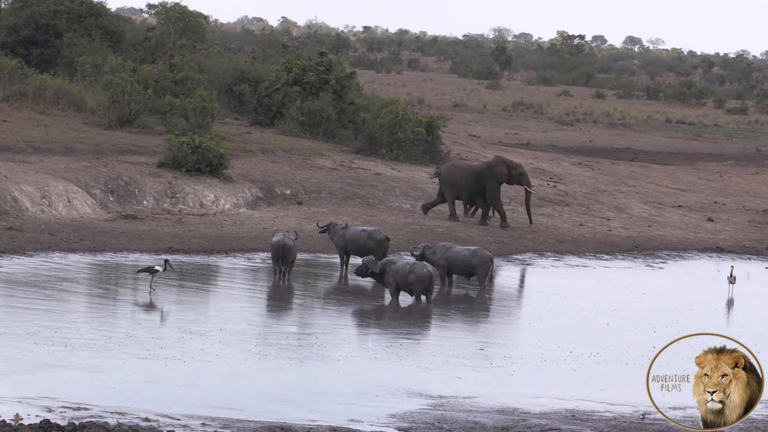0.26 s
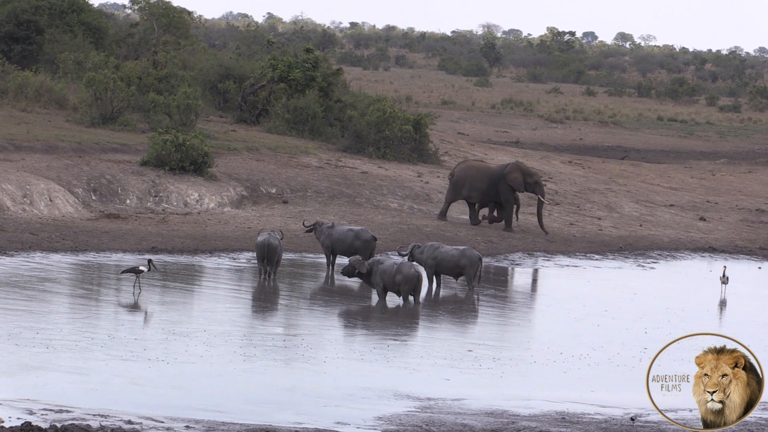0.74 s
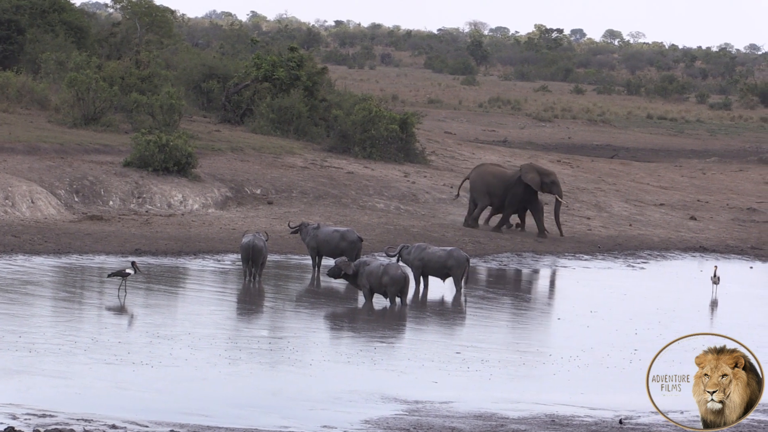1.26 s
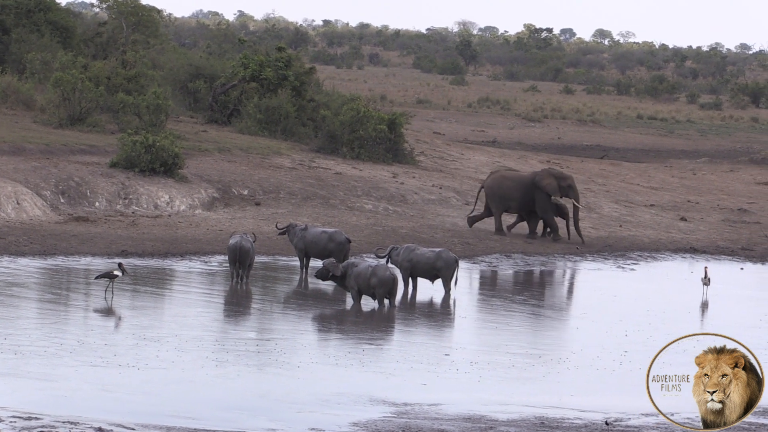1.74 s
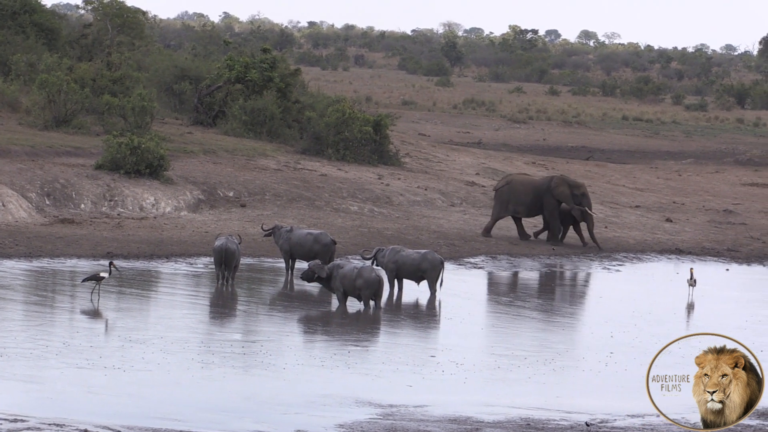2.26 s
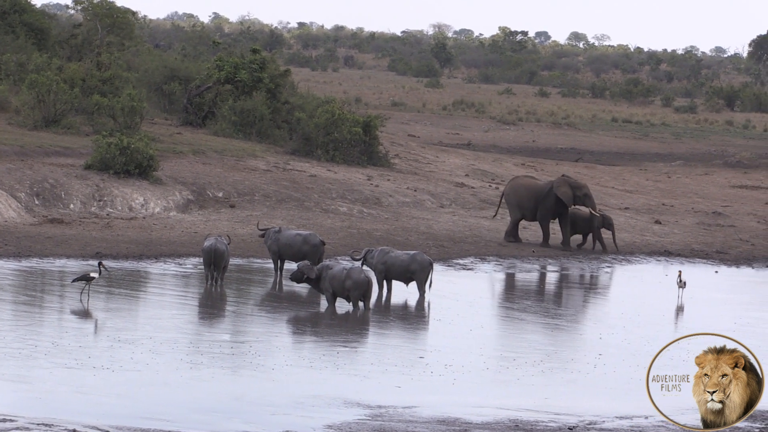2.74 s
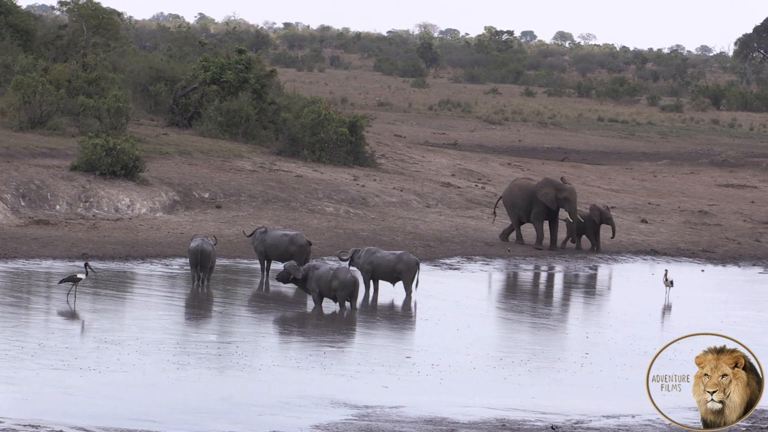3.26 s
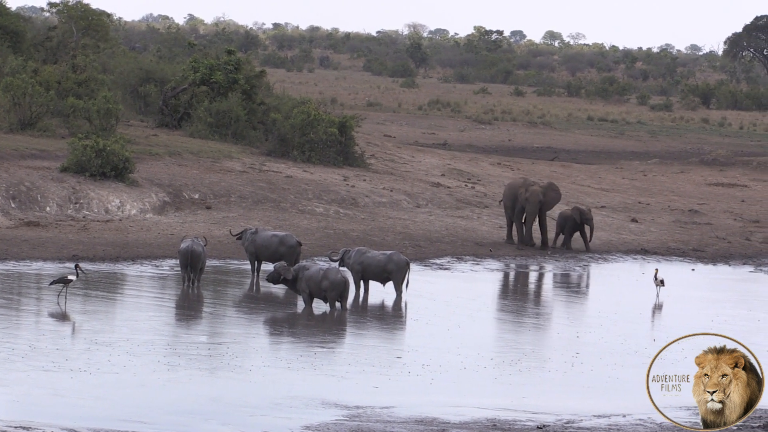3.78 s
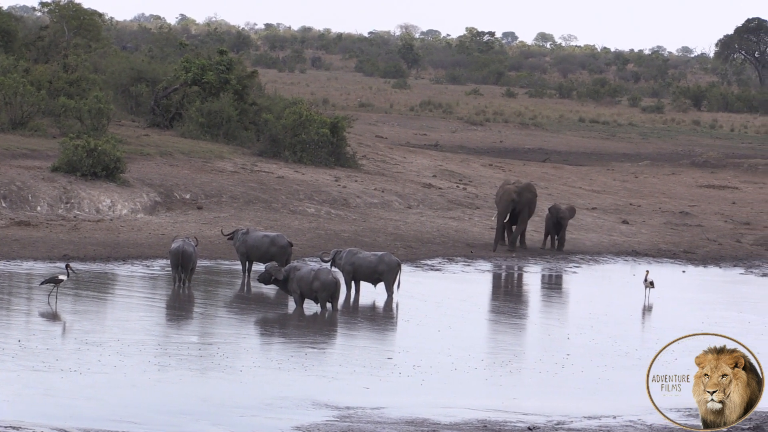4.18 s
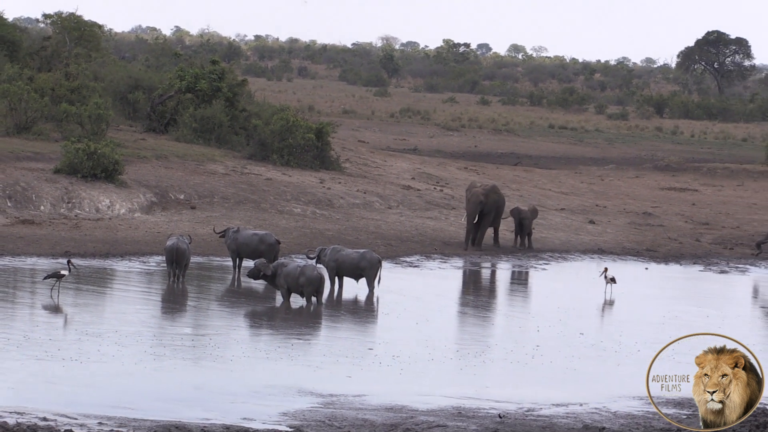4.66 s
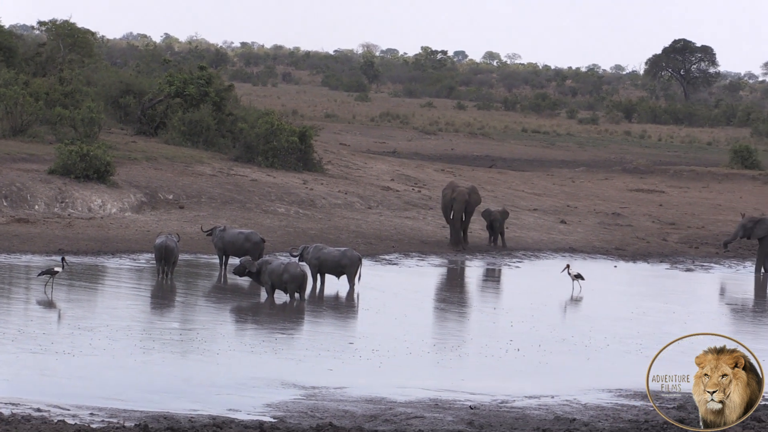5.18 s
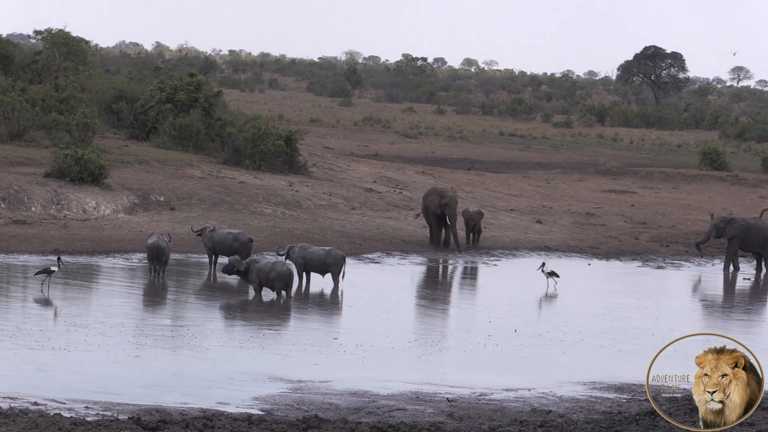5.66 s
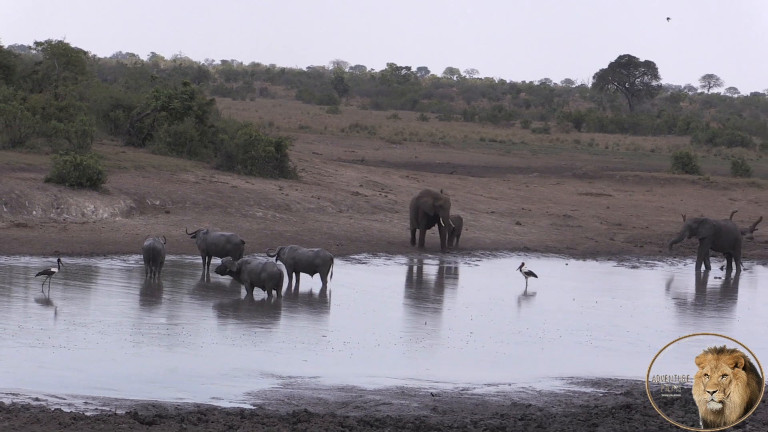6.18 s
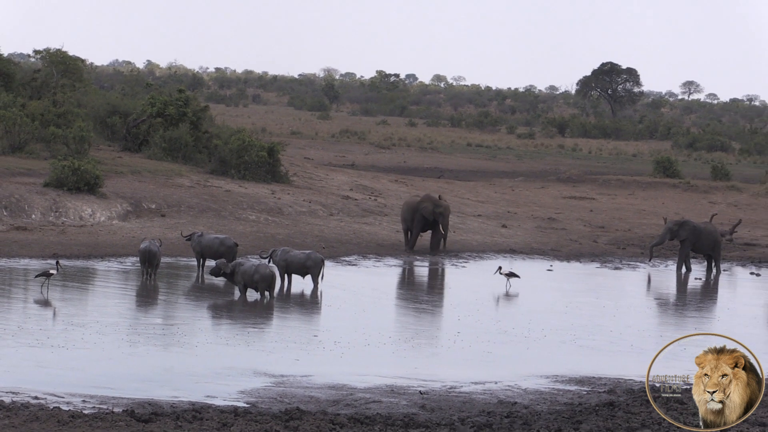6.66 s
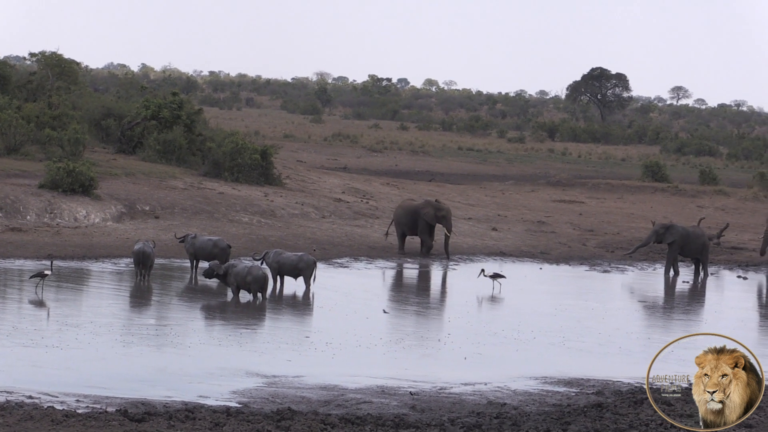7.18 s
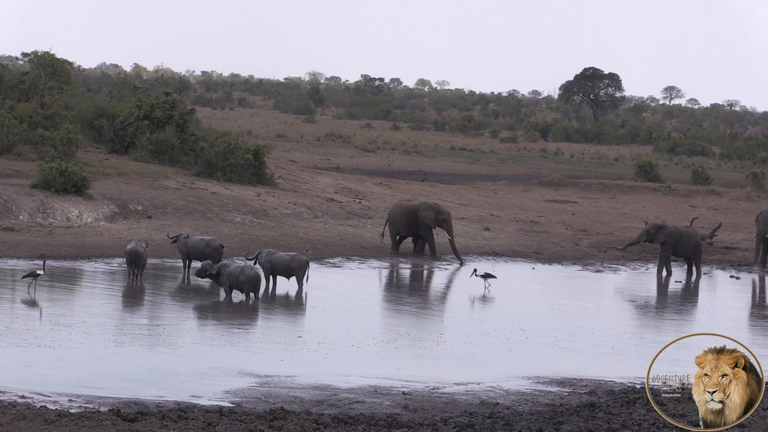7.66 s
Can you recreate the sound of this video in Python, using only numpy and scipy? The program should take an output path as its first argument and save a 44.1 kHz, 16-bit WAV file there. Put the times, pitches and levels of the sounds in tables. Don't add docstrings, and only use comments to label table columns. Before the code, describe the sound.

Whistling waterfowl call almost nonstop at a waterhole, slurring up and flipping higher, over wading splashes, a low engine idle and soft open air.

```python
import sys
import numpy as np
from scipy import signal
from scipy.fft import rfft, irfft
from scipy.io import wavfile
from scipy.ndimage import uniform_filter1d, map_coordinates

SR = 44100
rng = np.random.default_rng(int(sys.argv[2]) if len(sys.argv) > 2 else 0)


def voltage_ratio(decibels):
    exponent = np.asarray(decibels, float) / 20
    return 10 ** exponent


def digitize_waveform(pressure):
    field = np.atleast_2d(pressure).T
    bounded = np.clip(field, -1, 1)
    quanta = np.round(bounded * 32767).astype(np.int16)
    wavfile.write(sys.argv[1], SR, quanta)


N = 349272


def unit(x):
    return x / np.sqrt(np.mean(x ** 2) + 1e-20)


def along(points, hz):
    f, v = np.transpose(points)
    return np.interp(np.log(hz + 1), np.log(f + 1), v)


def curves(rows):
    times, *columns = np.transpose(rows)
    return [np.interp(np.arange(N) / SR, times, column) for column in columns]


def wobble(rate, size=N):
    knots = rng.standard_normal(int(size * rate / SR) + 4)
    return map_coordinates(knots, [np.arange(size) * rate / SR])


def tone(hz):
    return np.sin(2 * np.pi * np.cumsum(hz, axis=-1) / SR)


def add(out, s, sound):
    part = out[..., max(round(s * SR), 0):][..., :sound.shape[-1]]
    part += sound[..., :part.shape[-1]]


def sides(pan_db):
    return voltage_ratio(np.array([pan_db / 2, -pan_db / 2])).reshape(2, -1)


def rush(spectrum, patchy_db):
    # (frequency [Hz], likeness [0-1])
    likeness = [(60, 1), (130, 1), (280, 0.9), (610, 0.92), (1320, 0.67), (2850, 0.21), (6180, 0.066),
                (13400, 0.08)]
    z = signal.stft(rng.standard_normal((2, N)), nperseg=512)[2]
    patches = uniform_filter1d(rng.standard_normal(z.shape[1:]), 6, 0)
    patches = uniform_filter1d(patches, 10, 1)
    noise = signal.istft(z * voltage_ratio(patchy_db * unit(patches)), nperseg=512)[1][:, :N]
    hz = np.fft.rfftfreq(N, 1 / SR)
    turn = np.arccos(np.clip(along(likeness, hz), -1, 1)) / 2
    mid, side = irfft(rfft(noise) * voltage_ratio(along(spectrum, hz)) * [np.cos(turn), np.sin(turn)], N)
    return unit(np.array([mid + side, mid - side]))


def flock():
    # (time [s], gain of the flip tops [dB])
    facing = [
        (0, -1),
        (2, -3.5),
        (4, -2.5),
        (5.5, -1.5),
        (6.8, 2),
        (7.9, 8),
    ]
    # (time of flip [s], slide [s], valley pitch [Hz], level [dB])
    low_pips = [(0.102, 0.067, 1720, -52.5), (0.766, 0.042, 1770, -49.5), (1.84, 0.049, 1774, -46),
                (1.906, 0.043, 1790, -49), (2.468, 0.04, 1790, -45), (2.552, 0.038, 1763, -42.5),
                (3.231, 0.063, 1886, -43), (3.552, 0.047, 1775, -44), (4.014, 0.063, 1705, -46),
                (4.306, 0.039, 1760, -44), (4.915, 0.034, 1750, -49), (4.638, 0.041, 1620, -56),
                (4.89, 0.063, 1800, -45), (.883, 0.04, 1790, -47.5), (4.36, .04, 1740, -47),
                (4.245, .06, 1830, -51), (4.995, 0.048, 1790, -48), (5.074, 0.035, 1836, -43.5),
                (6.954, 0.095, 1682, -49.5), (7.184, 0.022, 1750, -50), (7.571, 0.041, 1640, -51),
                (7.745, 0.045, 1678, -61)]
    high_pips = [(1.305, 0.052, 1962, -46), (1.381, 0.04, 1937, -45), (1.97, 0.071, 1870, -44),
                 (2.351, 0.059, 1930, -46.5), (2.426, 0.038, 1936, -46), (3.139, 0.061, 1860, -44.5),
                 (3.552, 0.05, 1947, -50), (3.919, 0.062, 1935, -48), (5.282, 0.081, 1908, -44),
                 (5.615, 0.085, 1912, -44), (6.01, 0.076, 1860, -44), (6.43, 0.037, 1823, -42),
                 (7.168, .05, 1870, -42), (7.254, 0.04, 1897, -41), (7.902, 0.024, 1915, -50.5),
                 (5.17, 0.047, 1800, -45), (6.85, 0.046, 1780, -45), (6.04, .03, 1800, -48),
                 (6.24, 0.052, 1840, -41), (.796, 0.032, 1760, -48), (.904, .015, 1850, -46),
                 (7.91, .03, 1650, -50)]
    tall_pips = [(.836, .026, 1700, -46), (3.962, .02, 1850, -49), (3.985, .02, 1860, -50),
                 (4.19, .04, 1950, -51), (5.36, 0.055, 1897, -40), (1.882, 0.048, 1950, -44)]
    arches = [(0.18, 0.066, 1740, -46), (0.932, 0.02, 1780, -50.5), (5.62, .015, 1750, -44),
              (4.443, 0.0299, 1760, -47.5), (6.541, 0.057, 1914, -46.5)]
    # (first flip [s], slide [s], valley pitch [Hz], flip spacing [s], level [dB])
    low_flip_arches = [(2.231, 0.048, 1760, 0.021, -45), (3.476, 0.049, 1766, 0.021, -47.5),
                       (3.775, 0.067, 1669, 0.03, -50.5), (5.276, 0.065, 1640, 0.025, -49.5),
                       (6.743, 0.038, 1730, 0.034, -47), (6.873, 0.021, 1800, 0.019, -44.5),
                       (7.269, 0.032, 1704, 0.032, -48.5), (7.497, 0.03, 1885, 0.034, -51),
                       (7.615, 0.05, 1666, 0.03, -48), (7.858, 0.043, 1632, 0.031, -49)]
    high_flip_arches = [(0.092, 0.046, 1974, 0.036, -51.5), (1.616, 0.055, 1890, 0.032, -49),
                        (2.001, 0.038, 1914, 0.033, -49), (2.648, 0.046, 1910, 0.032, -49),
                        (3.999, 0.046, 1940, 0.013, -47), (4.206, 0.074, 1976, 0.04, -49),
                        (4.59, 0.046, 1940, 0.037, -48), (4.961, 0.043, 1890, 0.039, -47),
                        (5.547, 0.03, 1990, 0.021, -46.5), (5.905, 0.052, 1840, 0.021, -48.5),
                        (5.98, 0.056, 2002, 0.028, -50), (6.33, 0.08, 1930, 0.036, -52)]
    short_twos = [(5.65, .02, 1730, .028, -54), (7.024, .042, 1760, .026, -47),
                  (7.087, .03, 1700, .029, -48), (6, .02, 1750, .031, -49),
                  (3.19, .02, 1750, 0.0223, -49.5), (5.165, .04, 1700, 0.015, -52),
                  (5.586, .03, 1720, .014, -43.5), (4.13, .02, 1750, .018, -50)]
    two_flips = [
        (.92, 0.02, 1900, 0.02, -48),
    ]
    three_flips = [(0.118, 0.02, 1708, 0.018, -49), (1.101, .02, 1720, .029, -50),
                   (3.155, 0.046, 1722, 0.033, -47.5), (3.93, 0.053, 1730, 0.025, -50),
                   (4.073, .012, 1736, .025, -47.5), (4.165, 0.03, 1780, 0.019, -50),
                   (4.2, 0.047, 1770, 0.019, -53), (4.663, 0.02, 1710, 0.025, -50.5),
                   (5.242, 0.038, 1760, 0.017, -41.5), (6.314, 0.038, 1777, 0.019, -39.5),
                   (7.455, 0.043, 1674, 0.024, -48)]
    high_trills = [(4.82, .042, 1760, .033, -46), (4.828, .03, 1680, .033, -49),
                   (1.093, 0.04, 1700, 0.029, -48.5), (3.346, .045, 1700, .031, -50),
                   (6.63, .04, 1780, .033, -45)]
    # (first flip [s], flip spacing [s], level [dB])
    four_flips = [(1.183, 0.023, -48), (2.753, 0.022, -46), (3.354, .029, -48.5), (3.748, 0.022, -48.5),
                  (4.368, .025, -46.5), (5.516, 0.031, -46.5), (5.93, .03, -43), (6.28, 0.022, -45.5),
                  (6.503, 0.026, -46)]
    full_trills = [(s, .042, 1727, period, db) for s, period, db in four_flips]
    # (whistles, top pitch [Hz], number of flips, last one held?)
    kinds = [(low_pips, 2054, 1, False), (high_pips, 2192, 1, False), (tall_pips, 2325, 1, False),
             (arches, 2030, 1, True), (low_flip_arches, 2153, 2, True), (high_flip_arches, 2395, 2, True),
             (short_twos, 2230, 2, False), (two_flips, 2395, 2, False), (three_flips, 2200, 3, False),
             (high_trills, 2365, 3, False), (full_trills, 2230, 4, False)]
    out = np.zeros((2, N))
    tops_db, = curves(facing)
    for table, top_hz, count, arch in kinds:
        for s, slide, valley_hz, *period, db in table:
            height = top_hz / valley_hz - 1
            call = whistle(slide, valley_hz, height, sum(period), tops_db[round(s * SR)], count, arch)
            add(out, s - slide, voltage_ratio(db - 0.7) * call * sides(rng.normal(-.7, .8)))
    return out


def whistle(slide, valley_hz, height, period, tops_db, count, arch):
    end = (count - 1) * period + (.046 if arch else .02 if count > 1 else .013)
    t = np.arange(-slide, end, 1 / SR)
    scoop = .12 * t / slide - 0.1498 * np.exp(-(t + slide) / 0.00998)
    glide = 1.06 + min(slide / .04, 1) ** 2 * scoop
    flips = np.zeros_like(t)
    for k in range(count):
        since = t - k * period - .006
        held = arch and k == count - 1
        fall = np.maximum(since - 0.01783, 0) / 0.0149 if held else since / .007
        quaver = 1 - held * 0.238 * np.sin(np.pi * 70 * np.maximum(since, 0)) ** 2
        flip = np.exp(-np.abs(np.where(since < 0, since / 0.00401, fall)) ** 2.63)
        flips += (1 - 0.0594 * k) * quaver * flip
    ratio = np.where(t < 0, glide, 1 + 0.06 * np.exp(-np.abs(t) / 0.01) + height * flips)
    ratio -= 0.16 * (count > 1 or arch) * np.exp((t - end) / 0.00653)
    hz = valley_hz * ratio * (1 + 0.0057 * wobble(124.7, len(t)))
    swell = (1 - np.exp(-(t + slide) / 0.018)) * (1 - np.exp((t - end) / 0.0043))
    swell *= voltage_ratio(tops_db * flips + 1.5 * wobble(60.0, len(t)))
    overtones = voltage_ratio(-36.5) * flips * tone(2 * hz) + voltage_ratio(-41.5) * tone(3 * hz)
    return np.sqrt(2) * swell * (tone(hz) + overtones)


def chirps():
    # (time [s], length [s], start pitch [Hz], level [dB])
    dives = [(.878, .035, 3500, -73.5), (1.3, 0.032, 4400, -70.5), (1.27, .02, 4200, -76),
             (1.178, 0.03, 3500, -68), (2.429, 0.022, 3600, -71), (4.43, .03, 4700, -78),
             (5.415, 0.033, 4700, -73), (5.662, 0.015, 3290, -65), (2.54, .02, 3600, -73),
             (6.56, .025, 3900, -74), (6.132, 0.041, 4660, -69.5), (7.457, .012, 3400, -67)]
    slurs = [(0.143, 0.057, 4560, -76), (0.417, 0.046, 4530, -78), (0.697, 0.049, 4500, -76),
             (0.962, 0.083, 4700, -77), (6.965, 0.018, 4500, -72)]
    peeps = [(4.645, 0.041, 2850, -74), (4.86, 0.032, 2870, -73), (5.545, .03, 6300, -80),
             (5.558, 0.056, 2900, -65.5), (5.694, 0.068, 3600, -67), (5.83, .12, 4320, -78.5),
             (4.83, .018, 5550, -80), (4.862, .022, 5550, -79), (6.09, 0.027, 3600, -78)]
    lifts = [
        (5.686, 0.016, 3050, -63),
        (7.507, 0.014, 2990, -66),
    ]
    sags = [(2.24, .035, 4760, -71.5), (2.26, .02, 5670, -77), (4.522, .04, 4680, -73),
            (4.53, .03, 5700, -77), (5.462, .048, 5050, -77), (5.655, 0.036, 4680, -69.5),
            (5.692, 0.023, 3220, -65.5), (6.195, 0.027, 4900, -71)]
    out = np.zeros((2, N))
    for table, slope in [(dives, -13), (slurs, -5.5), (peeps, -1.1), (lifts, 12.5), (sags, -3)]:
        for s, length, start_hz, db in table:
            u = np.linspace(0, 1, round(length * SR))
            octaves = slope * length * u * (.4 + .6 * u)
            hz = start_hz * 2 ** octaves * (1 + .006 * wobble(150, len(u)))
            shape = np.sin(np.pi * u) ** 0.12 * voltage_ratio(db + 4.5 + 3.5 * wobble(115, len(u)))
            add(out, s, shape * tone(hz) * sides(rng.normal(1.5, 2)))
    return out


def hoops():
    # (time [s], length [s], top pitch [Hz], level [dB])
    notes_up_and_over = [
        (7.25, .045, 3180, -64.5),
        (7.32, .052, 3420, -64),
        (.005, .07, 3420, -70),
    ]
    out = np.zeros((2, N))
    for s, length, top_hz, db in notes_up_and_over:
        u = np.linspace(0, 1, round(length * SR))
        hz = top_hz * (1 - 0.253 * ((u - .4) / .6) ** 2)
        add(out, s, np.sin(np.pi * u) ** .3 * voltage_ratio(db + 4.3 * wobble(90, len(u))) * tone(hz))
    return out


def buzz():
    # (time [s], length [s], centre pitch [Hz], sweep [Hz], sweep rate [1/s], level [dB])
    buzz_note = [
        (5.742, .072, 3370, 520, 75, -60),
    ]
    out = np.zeros((2, N))
    (s, length, centre_hz, sweep_hz, rate, db), = buzz_note
    t = np.arange(round(length * SR)) / SR
    saw = (rate * t) % 1
    shape = np.sin(np.pi * saw) * voltage_ratio(db + 2 - 5 * t / length)
    add(out, s, shape * tone(centre_hz + sweep_hz * (2 * saw - 1)))
    return out


def rasps():
    # (time [s], length [s], level [dB])
    rasp_calls = [(1.273, 0.075, -77), (2.164, 0.079, -71), (4.425, 0.13, -72.5), (5.41, .1, -77),
                  (5.585, .09, -78), (6.131, 0.087, -66), (6.682, .115, -74)]
    out = np.zeros((2, N))
    k = np.arange(4, 12)[:, None]
    for s, length, db in rasp_calls:
        u = np.linspace(0, 1, round(length * SR))
        hz = k * (560 + (1104 - 560) * np.exp(-(u / .5) ** 2))
        uneven = voltage_ratio([4.5 * wobble(86, len(u)) for _ in k])
        beak = np.exp(-((hz - 4730) / 1300) ** 2)
        voice = (uneven * beak * tone(hz)).sum(0)
        add(out, s, voltage_ratio(db + 1.5) * np.sin(np.pi * u) ** 0.37 * voice * sides(rng.normal(2.5, 1.5)))
    return out


def shore(x):
    ring_s = [(1000, 0.22), (3000, 0.14)]  # (frequency [Hz], time to fall 60 dB [s])
    hz, t, z = signal.stft(rng.standard_normal((2, SR // 3)), SR, nperseg=256)
    tail = signal.istft(z * voltage_ratio(-60 * t / along(ring_s, hz)[:, None]), SR, nperseg=256)[1]
    tail /= np.linalg.norm(tail, axis=1, keepdims=True)
    banks = voltage_ratio(-10.5) * signal.fftconvolve(x, tail, axes=1)[:, :N]
    surface = voltage_ratio(-10.0) * np.pad(x, ((0, 0), (round(0.0083 * SR), 0)))[:, :N]
    return voltage_ratio(-0.5) * x + surface + banks


def surges():
    # (time of peak [s], build-up [s], dying away [s], spray level [dB], mist against spray [dB])
    wading_legs = [(.3, .04, 0.036, -75, 3), (1.37, 0.15, .04, -66.5, -5), (1.48, 0.063, 0.12, -71.5, 3),
                   (1.68, 0.061, .11, -57, -6.5), (2.25, 0.19, 0.69, -72.5, -8),
                   (3.02, 0.23, 0.17, -61.5, -18), (3.35, 0.47, 0.53, -69.5, -8),
                   (3.82, 0.23, 0.36, -57, -26), (4.25, 0.59, 0.27, -67, -17), (5.55, 0.12, 0.27, -73, -11),
                   (6.82, 0.13, 0.24, -65, -9.5), (7.7, 0.039, 0.067, -64, -12)]
    t = np.arange(0, N, 64) / SR
    spray, mist = voltage_ratio(-76.5), voltage_ratio(-76.5 - 8.5)
    for s, build, dying, db, mist_db in wading_legs:
        away = np.abs((t - s) / np.where(t < s, build, dying))
        surge = voltage_ratio(db - 12.5 * away ** 1.25)
        spray, mist = np.hypot(spray, surge), np.hypot(mist, voltage_ratio(mist_db) * surge)
    return curves(np.transpose([t, spray, mist]))


def wading():
    # (frequency [Hz], level per Hz [dB])
    spray_spectrum = [(710, -33), (1200, -14), (1440, -5.5), (1960, -18), (2290, 4), (5860, -9.5),
                      (8990, -27.5), (13000, -55)]
    # (frequency [Hz], level per Hz [dB])
    mist_spectrum = [(2350, -41), (4000, -10), (4450, -4), (7070, -3.5), (12300, -26.5), (13500, -49)]
    spray, mist = surges()
    grain = voltage_ratio(2.1 * wobble(400))
    out = voltage_ratio(3.5) * spray * unit(grain * rush(spray_spectrum, patchy_db=3.0))
    return out + voltage_ratio(-1) * mist * unit(grain * rush(mist_spectrum, patchy_db=1.2))


def churning():
    # (time [s], level [dB])
    wash = [
        (0, -58.5),
        (1.2, -55.5),
        (2.2, -55.5),
        (2.7, -51.5),
        (3.4, -48),
        (3.9, -46.5),
        (4.15, -50.5),
        (4.3, -58),
        (6.2, -77),
        (7.92, -58.5),
    ]
    # (frequency [Hz], level per Hz [dB])
    churn_spectrum = [(180, -46), (300, -6.5), (566, 4), (855, -4.5), (1250, -0.5), (1480, -7),
                      (1730, -8.5), (2000, -14.5), (2600, -13), (4400, -120)]
    return voltage_ratio(curves(wash)[0] - 4) * rush(churn_spectrum, patchy_db=3.0)


def drops():
    # (time [s], level [dB])
    drop_ticks = [(1.3727, -51), (1.479, -47), (1.6516, -45), (2.359, -46), (2.389, -52), (3.2294, -57),
                  (5.1951, -49.5), (6.4293, -52), (6.8344, -57), (7.6899, -59)]
    # (time [s], level [dB], pitch [Hz], time to fall 60 dB [s])
    hollow_plop = [
        (5.195, -33, 365, .06),
    ]
    out = np.zeros((2, N))
    t = np.arange(SR // 12) / SR
    for s, db in drop_ticks:
        hiss = uniform_filter1d(rng.standard_normal(len(t)), size=4)
        ring = voltage_ratio(-60 * t / .004) * (np.sin(2 * np.pi * 3100 * t) + .3 * hiss)
        add(out, s, voltage_ratio(db + 5.5) * (1 - np.exp(-t / .0002)) * ring)
    (s, db, hz, t60), = hollow_plop
    add(out, s, voltage_ratio(db + 12 - 60 * t / t60) * (1 - np.exp(-t / .005)) ** 2 * np.sin(2 * np.pi * hz * t))
    return out


def engine():
    # (time [s], firing rate [Hz], level [dB])
    idle = [
        (0.0, 53.6, -54.5),
        (0.61, 56.95, -51.5),
        (1.52, 54.78, -53),
        (7.65, 54.49, -54.5),
        (7.92, 54.4, -54.5),
    ]
    # (multiple of firing rate, level [dB])
    orders = [(1, 1), (2, -8.5), (3, -10), (4, -14)]
    hz, db = curves(idle)
    turn = 2 * np.pi * np.cumsum(hz) / SR
    lead = .3 * np.array([[1], [-1]])
    out = np.zeros((2, N))
    for k, level in orders:
        loudness = voltage_ratio(db + level + 0.81 * k * wobble(9))
        out += loudness * np.sin(k * turn + lead + 0.077 * k * wobble(8))
    return out


def fan():
    # (pitch [Hz], level [dB])
    hums = [(239, -60), (717, -78.5), (1050, -70)]
    t = np.arange(N) / SR
    return sum(voltage_ratio(db + 2 + 1.4 * wobble(6.6)) * np.sin(2 * np.pi * hz * t + .5 * wobble(5)) for hz, db in hums)


def wind():
    # (time [s], level [dB], pitch [Hz], left over right [dB])
    puffs = [(0.378, -47, 72.7, -18), (0.428, -41, 72.7, -11.0), (0.468, -39, 91.5, -15),
             (0.623, -33, 107, 8.5), (0.664, -42, 72.7, 15), (0.698, -42, 84, 25), (0.727, -37, 73.4, -14),
             (0.745, -37, 72.7, -6), (0.822, -40, 74, 17.5), (1.198, -45, 113, -7), (1.226, -42, 73, -20),
             (1.239, -48, 137, -11)]
    out = np.zeros((2, N))
    t = np.arange(-.03, .03, 1 / SR)
    for s, db, hz, pan_db in puffs:
        swing = np.cos(2 * np.pi * hz * t + rng.normal(0, 1.0, (2, 1)))
        add(out, s - .02, voltage_ratio(db) * np.exp(-(2.4 * t * hz) ** 2) * swing * sides(pan_db))
    return out


def open_air():
    # (frequency [Hz], level per Hz [dB])
    air_spectrum = [(15, -28), (40, -11), (80, -13), (130, -5), (240, -6.5), (284, -10), (644, -10),
                    (1040, -15.5), (1460, -20.5), (1810, -18), (2750, -27.5), (11200, -47.5), (12800, -51),
                    (13200, -67)]
    return voltage_ratio(-53.5) * rush(air_spectrum, patchy_db=1.5)


def scene():
    birds = shore(flock() + chirps() + hoops() + buzz() + rasps())
    water = wading() + churning() + drops()
    return birds + water + engine() + fan() + wind() + open_air()


def roll_off(x):
    return signal.sosfilt(signal.butter(12, 13970, fs=SR, output="sos"), x)


def record(dry):
    return roll_off(dry)


dry = scene()
out = record(dry)
digitize_waveform(out)
```